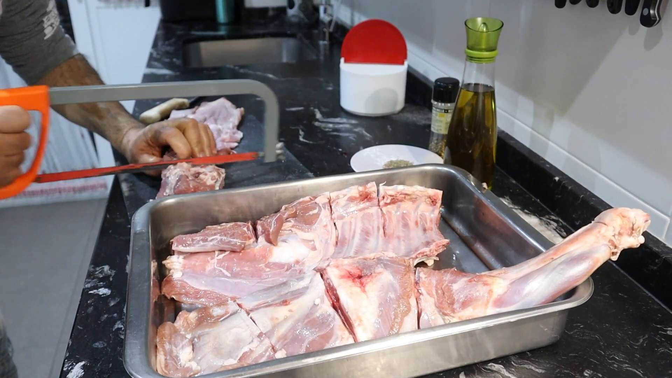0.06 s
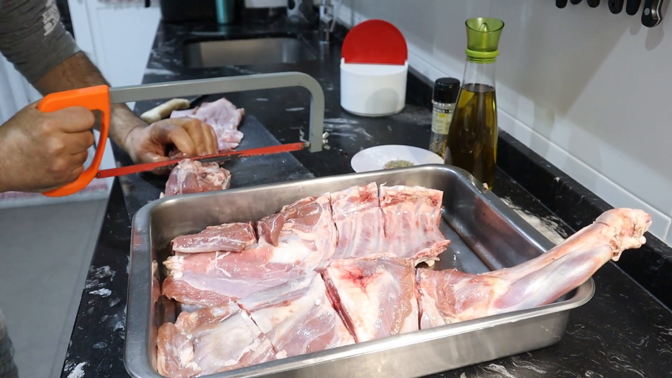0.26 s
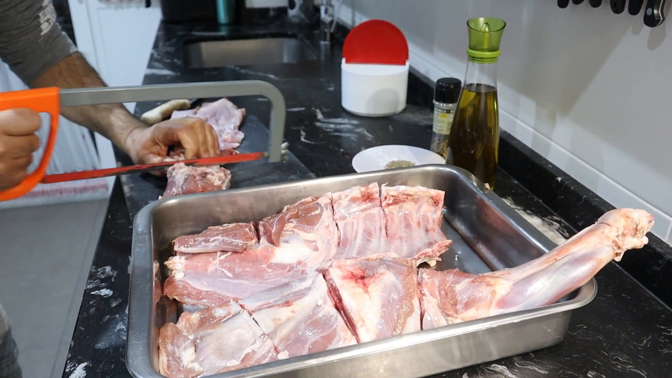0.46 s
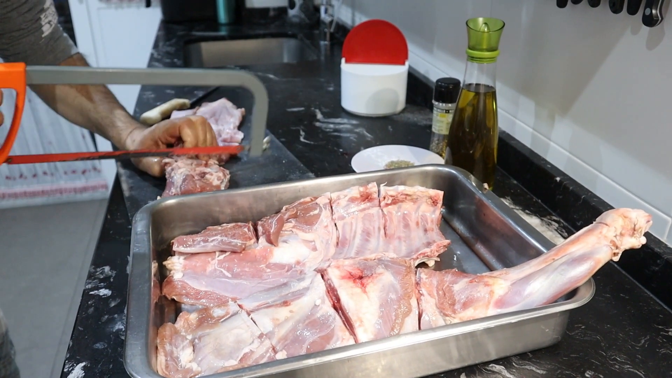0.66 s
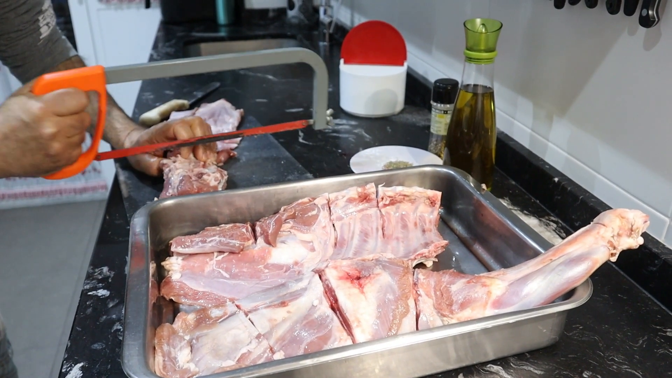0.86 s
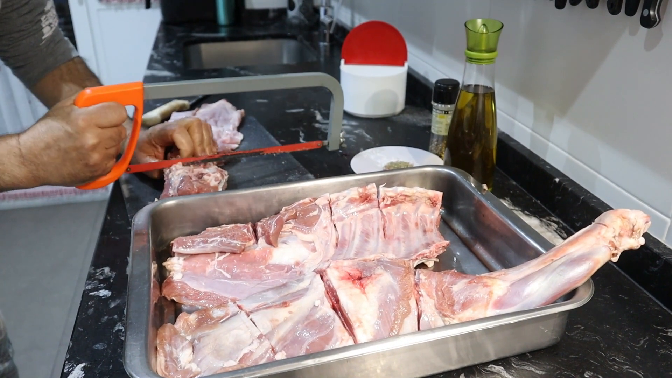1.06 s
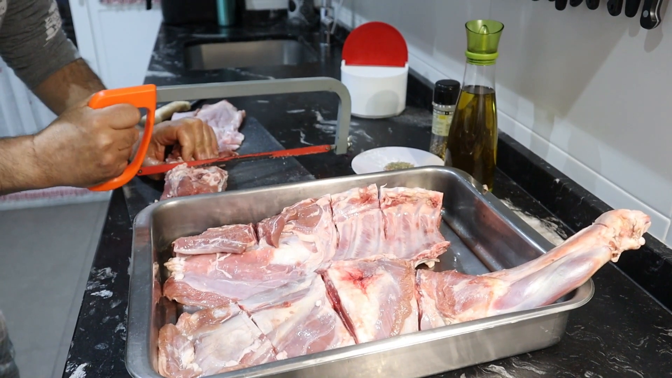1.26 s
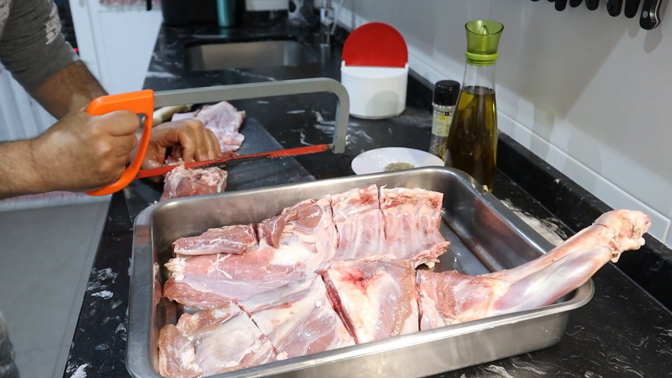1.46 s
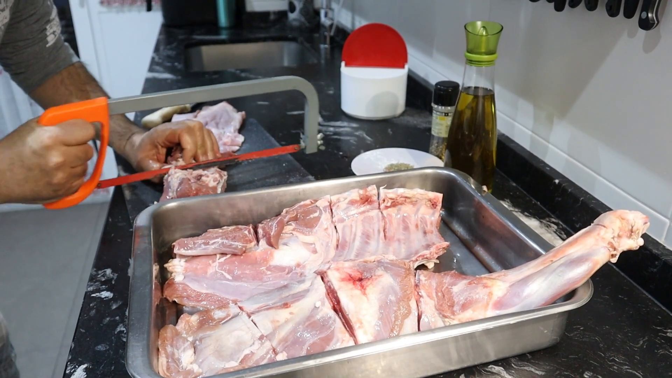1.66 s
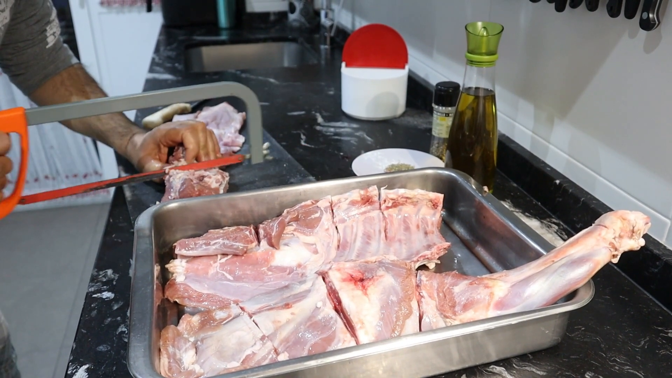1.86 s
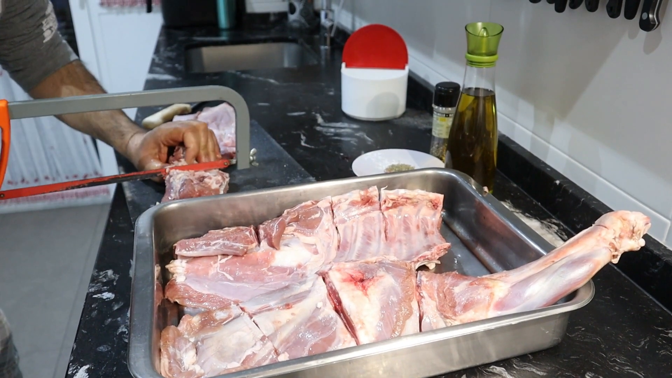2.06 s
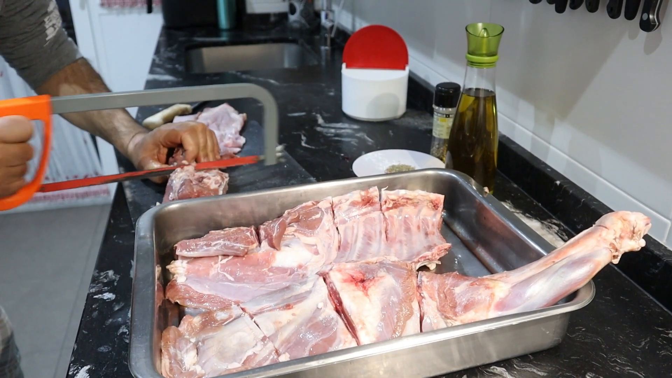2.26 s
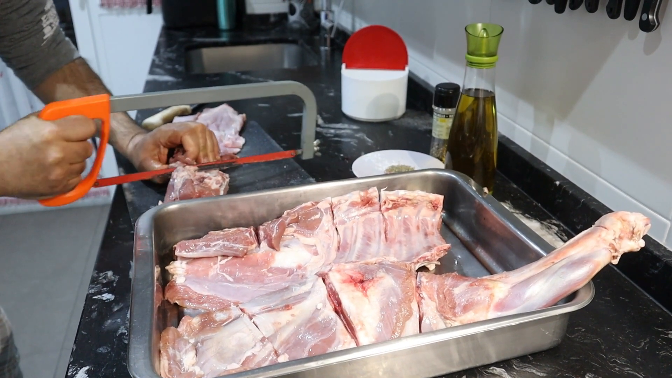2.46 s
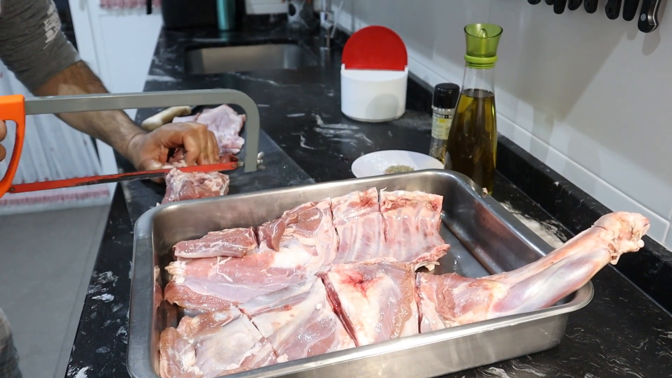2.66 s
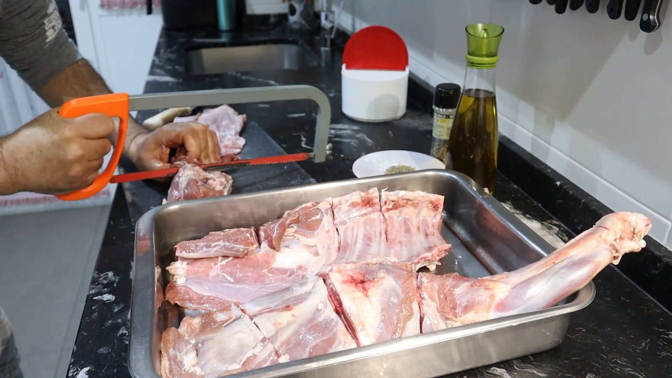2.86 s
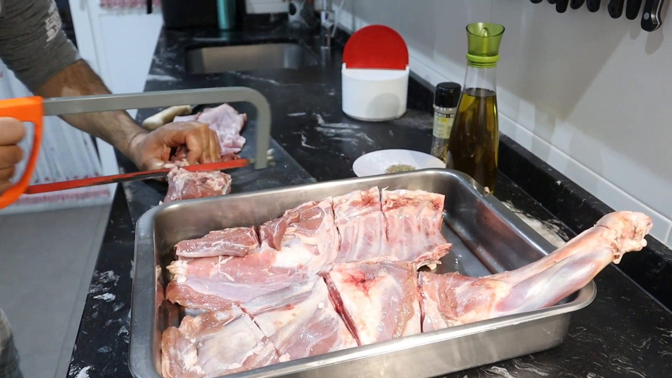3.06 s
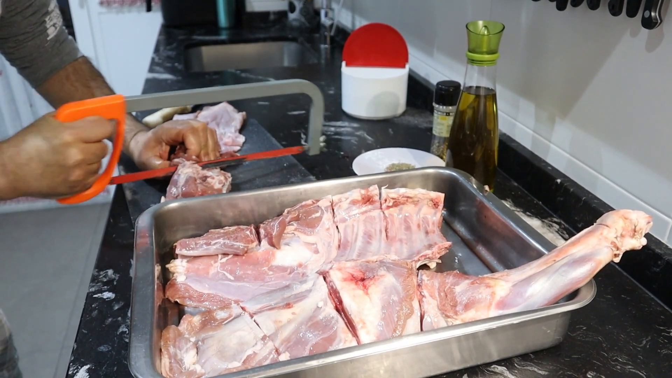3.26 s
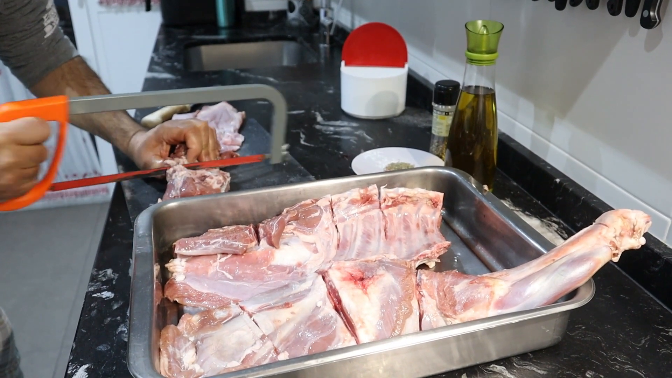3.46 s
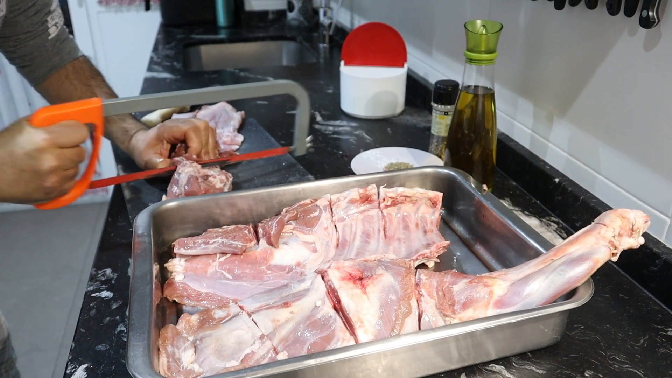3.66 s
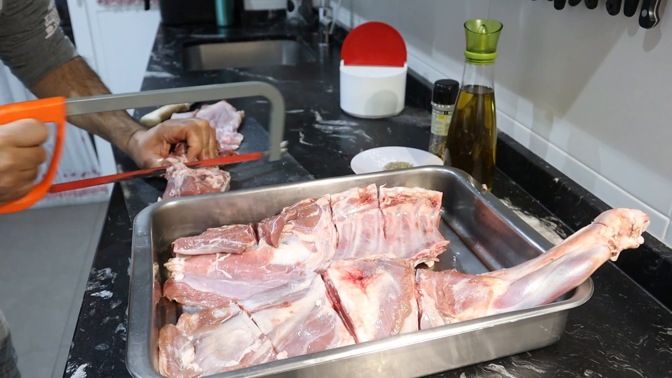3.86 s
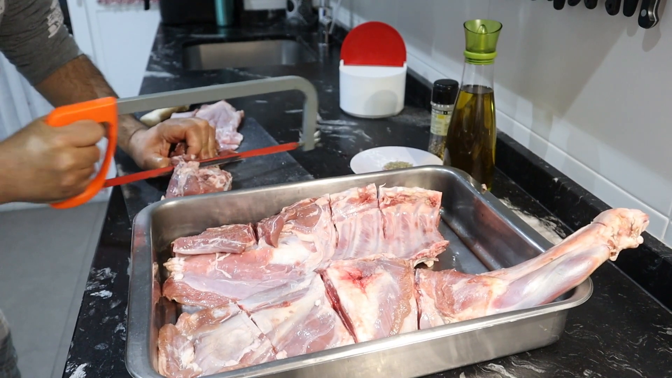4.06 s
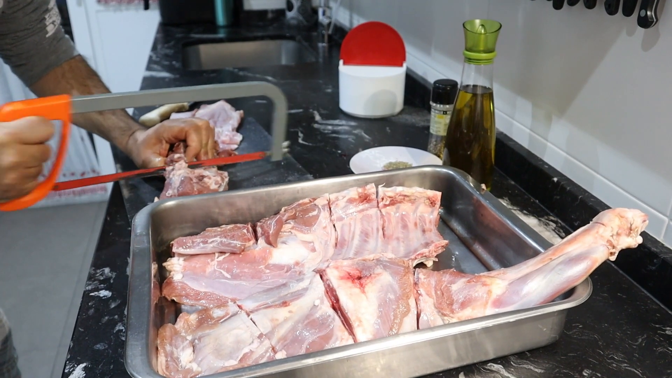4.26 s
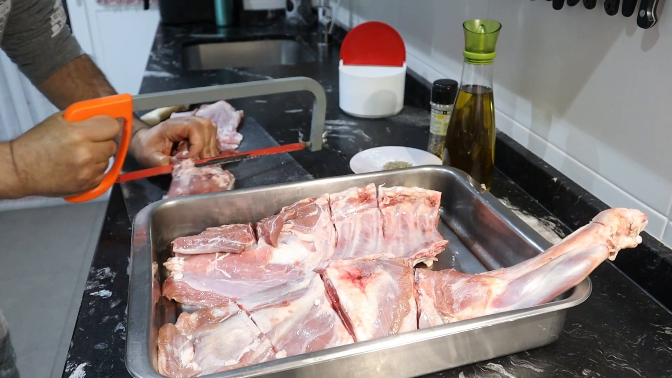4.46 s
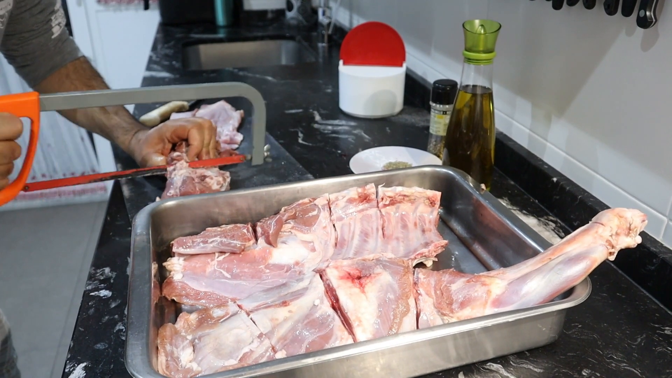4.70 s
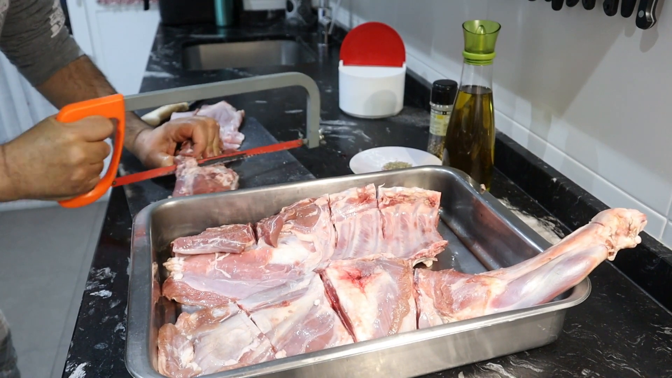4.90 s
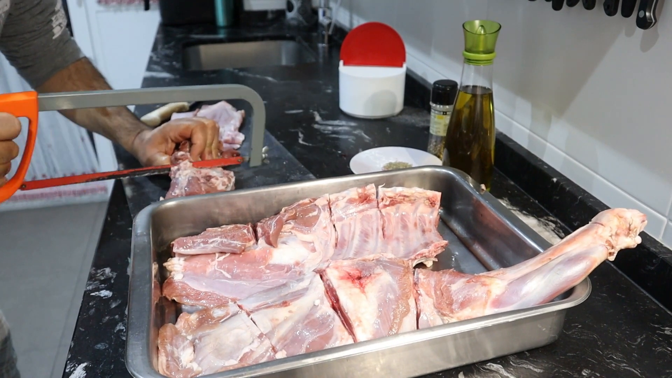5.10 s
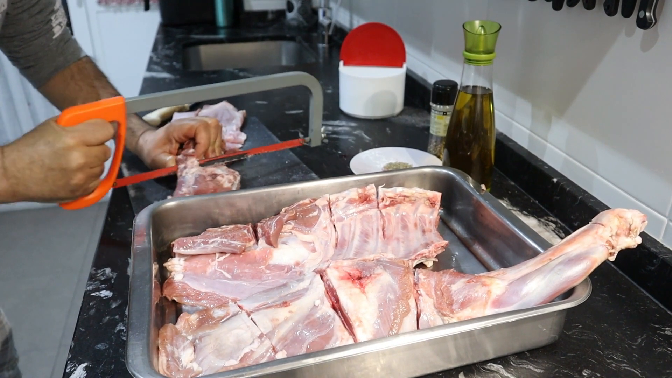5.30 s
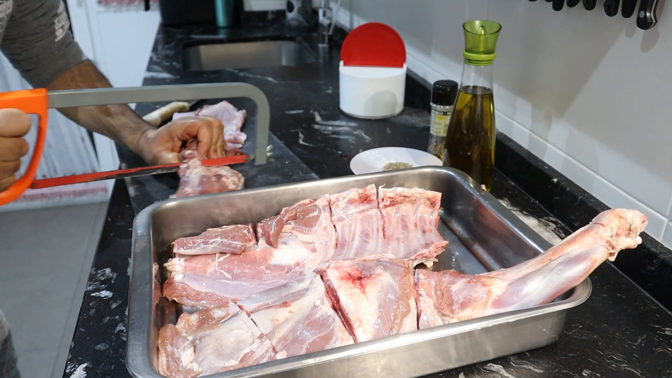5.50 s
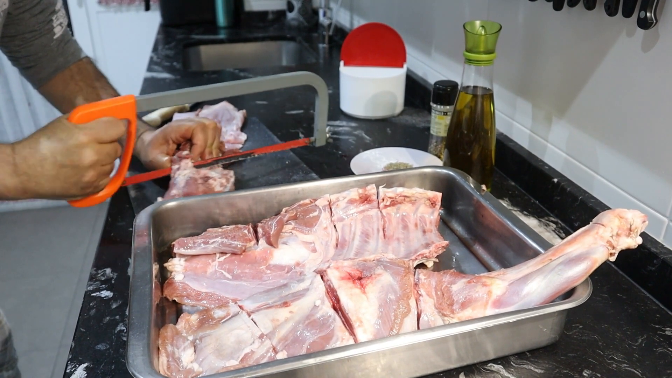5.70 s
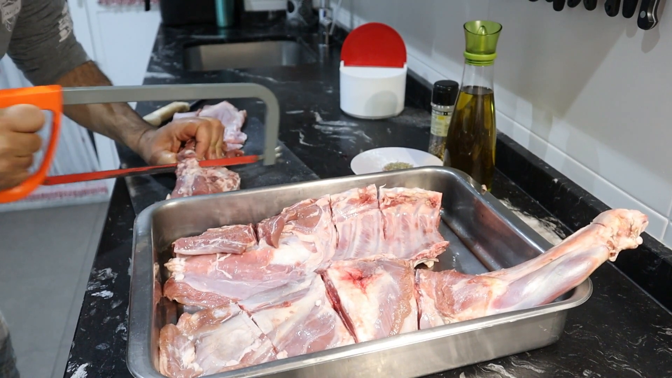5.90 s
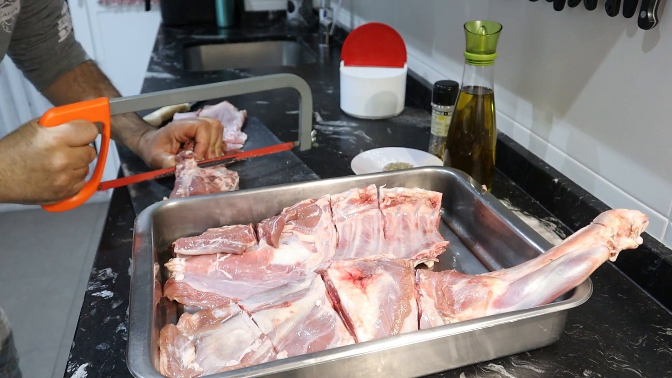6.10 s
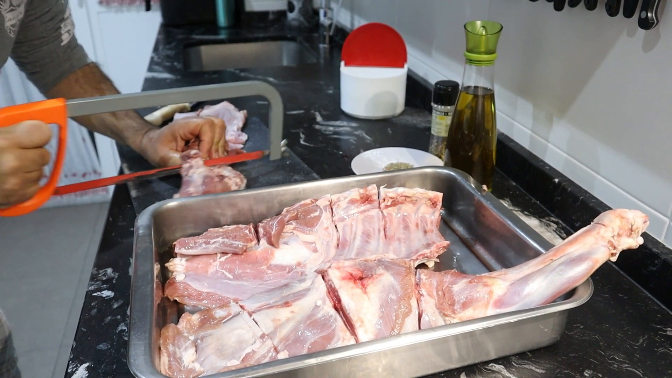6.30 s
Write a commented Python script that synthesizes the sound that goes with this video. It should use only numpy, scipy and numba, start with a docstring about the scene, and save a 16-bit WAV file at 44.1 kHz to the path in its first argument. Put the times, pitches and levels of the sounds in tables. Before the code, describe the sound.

A few light hacksaw strokes on bone, a short pause, then steady gritty sawing with sharp catches and knocks against a kitchen counter.

```python
"""Hacksaw through bone

A hacksaw is drawn to and fro through bone on a stone kitchen counter, an arm's length from a phone.
Teeth chip at the bone in a dense hail of clicks that rasps and rings blade and frame; now and then one
catches and tears free. Hard strokes shake the joint of meat against the counter. A refrigerator hums.
The phone widens the image, turns down when loud, and clips."""
import sys
import numpy as np
from scipy import signal
from scipy.fft import rfft, irfft, next_fast_len
from scipy.io import wavfile
from scipy.ndimage import uniform_filter1d
from numba import njit

SR = 44100
rng = np.random.default_rng(int(sys.argv[2]) if len(sys.argv) > 2 else 0)


def put_to_file(sound):
    """Save the sound as 16-bit audio at rate SR, in the file named by the first command-line argument."""
    columns = np.atleast_2d(sound).T  # one column per channel
    safe = np.clip(columns, -1, 1)
    whole_steps = np.round(safe * 32767)
    wavfile.write(sys.argv[1], SR, whole_steps.astype(np.int16))


N = 279884


def undb(db):
    return 10 ** (np.asarray(db) / 20)


def unit(x):
    return x / np.sqrt(np.mean(x ** 2))


def walk(rate):
    """Slow random modulation: levels held 1 / rate s, joined by ramps."""
    k = int(SR / rate)
    return 0.62 * uniform_filter1d(np.repeat(rng.standard_normal(N // k + 1), k), k)[:N]


@njit
def resonator(x, tuning, damping):
    """Damped oscillator: a state-variable band-pass with gain 1 at its moving centre."""
    y, band, low = np.empty(len(x)), 0., 0.
    for i in range(len(x)):
        g = tuning[i]
        v = (band + g * (x[i] - low)) / (1 + g * (g + damping))
        band, low, y[i] = 2 * v - band, low + 2 * g * v, damping * v
    return y


def ring(x, modes, wander_db=0., glide=0.):
    """Modal superposition in alternating sign; level and pitch may wander as the contact point moves."""
    sound = 0
    for k, (hz, width, db) in enumerate(modes):
        gain = (-1) ** k * undb(db + wander_db * walk(17))
        tuning = np.tan(np.pi * hz * (1 + glide * walk(7)) / SR)
        sound = sound + gain * resonator(x, tuning, width / hz)
    return sound


def colour(x, curve, lag_s=0.):
    """Linear filtering: gain through (Hz, dB) points, with an optional delay."""
    size = next_fast_len(N + 4096)
    hz = np.maximum(np.arange(size // 2 + 1) * SR / size, 1)
    point_hz, point_db = np.transpose(curve)
    gain = undb(np.interp(np.log(hz), np.log(point_hz), point_db))
    return irfft(rfft(x, size) * gain * np.exp(-2j * np.pi * hz * lag_s), size)[..., :N]


# Compressor tones. Each row: frequency in Hz, rms level in dB, left minus right in dB.
HUM_TONES = [(50.2, -44, -0.5), (99.4, -56, 8), (343, -78, 10)]
# Background air. Each row: frequency in Hz, relative spectral density in dB.
AIR_SPECTRUM = [(25, -1), (45, 25), (75, 13), (125, 13), (170, -10), (250, -27), (360, -0.5), (600, -7),
                (1100, -0.5), (2200, -3), (4500, -6.5), (6000, -13.5), (10000, -13.5), (11500, -16),
                (12300, -55)]


def fridge():
    """Periodic vibration of a compressor gives steady tones, over a diffuse rumble and hiss of air."""
    t = np.arange(N) / SR
    phase_per_hz = 2 * np.pi * t + .25 * walk(4) / HUM_TONES[0][0]
    hum = 0
    for hz, db, pan_db in HUM_TONES:
        tone = np.sqrt(2) * undb(db + 5.6 * walk(3.98)) * np.sin(hz * phase_per_hz)
        hum = hum + tone * undb([[pan_db / 2], [-pan_db / 2]])
    air = unit(colour(rng.standard_normal((2, N)), AIR_SPECTRUM))
    return hum + air * undb(-55 + 0.43 * walk(4.7))


# Saw strokes. Each row: start, rise, hold and fall in seconds; rasp level, sheen above rasp, and blade,
# frame, joint and counter levels in dB; time to the fastest moment in seconds, tooth rate then in Hz,
# whine level in dB, blade ring growth from mid-stroke to end of hold in dB, joint lag in seconds.
STROKES = [(-0.05, 0.051, 0.043, 0.12, -43.5, 4, -30, -23.5, -51, -55.5, 0.057, 944, -31.5, 0.5, .01),
           (0.132, 0.042, .18, 0.131, -40.5, 7.5, -48.5, -55, -61.5, -61, 0.053, 888, -65, 0, 0.0067),
           (0.549, 0.066, .055, .14, -42.5, -4, -29.5, -24, -54, -73, 0.069, 982, -35.5, -1, 0.048),
           (1.639, 0.088, 0.0401, .1, -46, -5, -26.5, -23.5, -49, -70, 0.0402, 782, -27, -2, .012),
           (1.651, 0.18, .23, 0.13, -20.5, -8, -21.5, -18.5, -46, -72, 0.17, 1199, -29, -0.3, 0.0033),
           (2.316, 0.06, 0.044, 0.11, -42.5, 5.5, -41, -56.5, -60, -60, 0.086, 1212, -81, -8, 0.0082),
           (2.384, .12, 0.025, 0.12, -28, -0.5, -41.5, -48, -45.5, -52.5, 0.13, 1253, -38.5, 4, 0.013),
           (2.641, 0.064, 0.078, 0.13, -21, -8.5, -23, -23.5, -50.5, -65, 0.092, 1188, -53, 2, 0.021),
           (2.83, 0.054, 0.00989, 0.092, -23, -5, -31, -28.5, -40, -62, 0.049, 1200, -60, 3, 0.013),
           (2.858, .1, .04, 0.1, -23, -5, -28.5, -35, -39, -49, 0.1, 1208, -55, 5.5, 0.0092),
           (3.107, 0.049, 0.08, 0.1, -18, -6.5, -23.5, -24, -43.5, -58, 0.092, 1594, -31, 2, 0.018),
           (3.265, 0.068, .015, 0.078, -17.5, -5, -26, -32, -36.5, -64, 0.087, 1000, -33.5, 3.5, .012),
           (3.343, 0.045, 0.06, 0.097, -18, -5.5, -25.5, -28.5, -37.5, -56, .085, 1243, -26.5, 2.5, 0.022),
           (3.493, 0.036, .01, .06, -23, -6, -29, -45, -47, -64, .05, 1250, -45, -5, 0.011),
           (3.528, .05, .025, 0.11, -14.5, -6.5, -20.5, -21, -54, -66, 0.055, 1785, -13.5, -5, .012),
           (3.562, 0.055, 0.053, 0.13, -23.5, -3, -23.5, -28, -23, -37, 0.083, 1205, -53, 1, 0.0073),
           (3.7, 0.049, 0.01495, 0.076, -19.5, -3, -28, -24, -35, -53, 0.061, 1146, -48, 5.5, 0.009),
           (3.746, 0.047, .055, 0.12, -17, -2, -28.5, -25, -35.5, -49, 0.074, 1194, -29.5, 4.5, 0.0065),
           (3.913, 0.098, 0.046, .12, -19, -4.5, -28.5, -26, -44, -60, 0.12, 1639, -26, 8.5, 0.019),
           (4.113, 0.044, 0.059, .17, -13, -3, -21.5, -26.5, -39.5, -56.5, .08, 921, -21.5, 1.5, .03),
           (4.242, .18, 0.027, 0.15, -21, -4, -36, -26, -44, -51, 0.17, 1570, -28.5, 11, .012),
           (4.509, 0.049, 0.041, 0.123, -14, -2.5, -28, -36, -18.5, -30.5, .07, 1182, -19.5, 3.5, 0.011),
           (4.615, 0.19, 0.055, 0.12, -24, -2.5, -35, -24, -45, -49.5, 0.2, 1736, -34.5, 12, 0.0059),
           (4.892, 0.061, 0.0214, .13, -15.5, 1, -21.5, -40, -35, -50, 0.11, 1089, -27.5, -4, .04),
           (5.029, 0.16, 0.066, 0.072, -24, -3.5, -38, -28, -43, -60, 0.17, 1740, -26.5, 13.5, 0.0051),
           (5.274, 0.053, 0.036, 0.17, -18, 2.5, -20.5, -46, -31.5, -50, 0.085, 1289, -23.5, -2, 0.045),
           (5.421, 0.096, 0.11, 0.089, -27.5, -2, -25.5, -23.5, -39, -58, 0.165, 1750, -21, 4, 0.013),
           (5.647, 0.049, .08, 0.13, -19, 2, -24.5, -48, -34.5, -52.5, 0.105, 1423, -22, -3.5, .03),
           (5.844, 0.062, 0.027, .04, -24.5, -4, -31.5, -21, -30.5, -45, 0.08, 1183, -35, 13, .012),
           (5.905, 0.042, 0.14, .1, -49, -28, -21, -19, -14, -30.5, .08, 1236, -43, -2, .012),
           (6.056, 0.069, .03, 0.095, -17, -0.5, -19.5, -21, -21, -44, 0.085, 1374, -46, -14, 0.003),
           (6.259, 0.11, 0.058, 0.11, -30.5, -7, -37, -30, -31, -39, .1, 1312, -64, -6, 0.011)]


def strokes():
    """Incoherent sources add in power: six envelopes of overlapping strokes, then tooth rate and whine."""
    t = np.arange(0, N + 128, 64) / SR
    (start, rise, hold, fall, rasp, bright, blade, frame, joint, thud,
     fastest, top_hz, whine_db, growth, lag) = np.transpose(STROKES)[..., None]
    age = t - start

    def swell_db(age, fall):
        rising = np.maximum(1 - age / rise, 0) ** 1.7
        falling = (np.maximum(age - rise - hold, 0) / fall) ** 0.95
        return -31.5 * (rising + falling)

    light = swell_db(age, fall)
    treble = swell_db(age - 0.014 * rise, fall)
    heavy = swell_db(age - lag, 1.42 * fall)  # the heavy joint settles more slowly
    speeding = age < fastest
    off_peak = np.abs(age - fastest) / (rise + hold)
    frame = frame - np.where(speeding, 34, 12.5) * off_peak  # sings most at the fastest moment
    blade = blade + growth * np.clip(2 * age / (rise + hold) - 1, -2, 2)
    layers_db = (light + rasp, treble + rasp + bright, light + blade, light + frame,
                 heavy + joint, heavy + thud)
    layers = [np.sqrt(np.sum(undb(db) ** 2, axis=0) + undb(-110) ** 2) for db in layers_db]
    whine_level = undb(whine_db - 28.5 * off_peak + light).sum(axis=0)
    speed = np.maximum(1 - np.where(speeding, 0.8, 0.3) * off_peak, .65)
    weight = undb(np.maximum(light, -200)) ** 2  # the stroke under way sets the tooth rate
    tooth_hz = np.sum(weight * top_hz * speed, axis=0) / weight.sum(axis=0)
    return [np.interp(np.arange(N) / SR, t, curve) for curve in (*layers, tooth_hz, whine_level)]


def chips(per_s, spread_db, chatter_db, chatter_hz):
    """Shot noise: random clicks of uneven size, whose force comes and goes as the blade chatters."""
    hit = rng.random(N) < per_s / SR
    size = undb(spread_db * np.minimum(rng.exponential(size=N), 5)) * rng.choice([-1, 1], N)
    return hit * size * undb(chatter_db * walk(chatter_hz))


# Cutting-edge resonances: the rasp, the sheen above it, and the top treble of a tooth tearing free.
# Each row: frequency in Hz, bandwidth in Hz, gain in dB.
RASP_MODES = [(3660, 1330, -7), (4830, 1160, 0), (5590, 950, 0.5), (7120, 2290, -9.5)]
SHEEN_MODES = [(8170, 1340, 6.5), (8086, 2480, 7.5), (10950, 1920, -0.5), (12540, 3400, -4.5)]
TEAR_MODES = [(13200, 2500, -11.5)]


def cutting_edge(teeth, rasp, sheen, tear):
    """Impacts excite broad treble resonances; a tearing tooth throws a denser spray of chips."""
    spray = rng.standard_normal(N)
    force = np.hypot(rasp, tear)
    drive = (rasp * unit(teeth) + tear * spray) / force
    grit = unit(ring(drive, RASP_MODES, wander_db=1.5, glide=.04))
    shine = unit(ring(drive, SHEEN_MODES, wander_db=1.5, glide=.03))
    lowpass = signal.butter(14, 12000, fs=SR, output="sos")
    return signal.sosfilt(lowpass, force * (grit + sheen / rasp * shine)) + tear * ring(spray, TEAR_MODES)


# Modes of the steel blade and its frame. Each row: frequency in Hz, bandwidth in Hz, gain in dB.
BLADE_MODES = [(833, 63, -22.5), (992.5, 69, -13.5), (1212, 31, -8.5), (1339, 96, -14), (1920, 344, -6.5),
               (2315, 171, 2), (2690, 360, -2.5), (3360, 660, -7.5)]
FRAME_MODES = [(1630, 92, -10.5), (1767, 25.8, 0)]


def blade_and_frame(teeth, blade, frame, clang):
    """Resonance: tooth clicks ring the steel at its natural frequencies, harder at a catch."""
    blade_ring = np.hypot(blade, .6 * clang) * unit(ring(teeth, BLADE_MODES, wander_db=1.5, glide=.02))
    frame_ring = np.hypot(frame, .4 * clang) * unit(ring(teeth, FRAME_MODES))
    return blade_ring + frame_ring


def whine(phase):
    """Periodic forcing: evenly set teeth strike in turn, at a rough pitch that follows blade speed."""
    bites = np.cos(phase) + undb(-17) * np.cos(2 * phase) + undb(-11) * np.cos(3 * phase)
    bites *= undb(2.5 * walk(70))
    return .2 * bites + 8 * ring(bites, BLADE_MODES[1:4]) + 6 * ring(bites, FRAME_MODES)


# Modes of the joint of meat and the counter. Each row: frequency in Hz, bandwidth in Hz, gain in dB.
JOINT_MODES = [(385, 77, -11.5), (504.7, 30.4, -2), (592.4, 64, -3), (810, 125, -3), (1180, 246, -2),
               (1570, 460, -2), (2460, 810, -7)]
COUNTER_MODES = [(53.7, 16.2, 6), (112, 22.3, 6), (218.2, 14, 0), (280, 52, -13.5)]


def joint_on_counter(judder, joint, thud, knock):
    """Forced vibration: the shaken joint and the counter sound their modes, each through a broad band."""
    shaking = ring(ring(judder, JOINT_MODES, wander_db=3.3), [(1000, 1500, 0)])
    rumble = ring(ring(judder, COUNTER_MODES), [(147, 380, 0)])
    return np.hypot(joint, knock) * unit(shaking) + np.hypot(thud, 0.1 * knock) * unit(rumble)


# Teeth catching and tearing free. Each row: time in seconds, peak level of the tear in dB,
# blade ring in dB, low knock in dB, time to decay by 60 dB in seconds.
CATCHES = [(0.159, -16.5, -39, -49, 0.015), (0.169, -12, -56, -43, .017), (0.214, -26, -52, -44, 0.019),
           (0.271, -19, -55, -60, .05), (0.284, -16.5, -39, -67, 0.11), (0.3166, -19, -40, -49, 0.0035),
           (0.365, -11.5, -56, -67, 0.0052), (0.574, -31, -53, -43, 0.015), (0.600, -20, -26, -62, .008),
           (1.468, -48, -71, -82, 0.085), (1.676, -16, -30, -62, .017), (2.329, -46, -60.5, -70, 0.016),
           (2.371, -8.5, -39, -68, 0.027), (2.429, -17.5, -52, -71, 0.013), (2.471, -9, -51, -59, 0.018),
           (2.679, -11, -23, -46, 0.027), (2.875, 3, -39, -42, 0.033), (2.936, -4, -34, -50, 0.035),
           (3.14, 5.5, -19, -33, .02), (3.313, 1.5, -24, -51, 0.017), (3.3794, 3, -17, -49, 0.028),
           (3.517, -10.5, -30, -45, 0.014), (3.536, -1.5, -28, -44, 0.01), (3.5682, 4, -23, -47, 0.015),
           (3.6109, -1, -2, -12.5, 0.022), (3.736, -13, -31, -18, 0.019), (3.7944, 6, -19, -36, 0.024),
           (3.9874, -4, -26, -36, 0.014), (4.0298, 4.5, -27, -46, 0.019), (4.14, -2, -36, -31, 0.026),
           (4.532, -3, -19, -23.5, 0.013), (4.554, -2, -6.5, -17.5, 0.08), (4.849, 1.5, -43, -76, 0.023),
           (4.926, -4, -69, -36, 0.024), (4.9436, 8, -10, -35, 0.013), (4.9758, -3.5, -34, -60, 0.015),
           (5.136, -14, -45, -40, 0.018), (5.236, -7, -26, -40, 0.012), (5.298, -1, -35, -27, 0.0098),
           (5.3243, 7, -13, -21.5, 0.015), (5.3832, 1, -16, -39, 0.028), (5.508, -23, -15, -32, 0.018),
           (5.683, 3, -17.5, -29, 0.023), (5.7048, -10, -7.5, -25, 0.019), (5.898, 2, -33, -35, 0.018),
           (5.930, -8, 3.5, 0, 0.0061), (5.9626, -13, -3.5, -12, 0.014), (5.997, -25, -10, -15, 0.011),
           (6.082, -24, -15.5, -6, 0.011), (6.102, -11, -18, -5.5, 0.015), (6.109, 0, -24, -5, .012)]


def catches():
    """Stick and slip: envelopes of each catch's tear, clang and knock rise fast and decay exponentially."""
    rise_s, crest_db = 0.0031, 15.5  # crest: peak of a burst of chips over its rms
    force = np.zeros((3, N))
    t = np.arange(SR // 8) / SR
    for start, tear_db, ring_db, knock_db, t60 in CATCHES:
        i = int(start * SR)
        shape = np.minimum(t / rise_s, 1) ** 2 * undb(-60 * np.maximum(t - rise_s, 0) / t60)
        force[:, i:i + len(t)] += undb([[tear_db - crest_db], [ring_db], [knock_db]]) * shape
    return force


# Modes of the bone. Each row: frequency in Hz, bandwidth in Hz, gain in dB.
BONE_MODES = [(1240, 270, -1), (1785, 350, -3), (3450, 1600, 0), (5080, 690, 5)]


def splinters():
    """Brittle fracture: each catch opens with three quick blows that ring the bone and tick off the edge."""
    blows, ticks = np.zeros((2, N))
    lags_s = rng.random((len(CATCHES), 3)) * [0, .002, .004]
    for (start, tear_db, ring_db, *_), lags in zip(CATCHES, lags_s):
        at = ((start + 0.0019 + lags) * SR).astype(int)
        blows[at] += undb(ring_db + 18.5) * np.array([1, -.8, .6])
        ticks[at] += undb(tear_db - 5) * np.array([1, -.6, .4])
    return ring(blows, BONE_MODES) + ring(ticks, RASP_MODES + SHEEN_MODES)


def saw():
    """Source and filter: tooth clicks drive edge and steel; a sparser judder drives joint and counter."""
    rasp, sheen, blade, frame, joint, thud, tooth_hz, whine_level = strokes()
    tear, clang, knock = catches()
    # the hand is unsteady and every tooth bites a little early or late
    phase = 2 * np.pi * np.cumsum(tooth_hz * (1 + .03 * walk(60) + .09 * walk(400))) / SR
    steel = whine_level * whine(phase)
    teeth = chips(5000, spread_db=2.5, chatter_db=2.5, chatter_hz=70)
    teeth *= 1 + 0.38 * np.cos(phase)  # chips fly in step with the passing teeth
    judder = chips(2500, spread_db=1.5, chatter_db=3, chatter_hz=90)
    steel += cutting_edge(teeth, rasp, sheen, tear)
    steel += blade_and_frame(teeth, blade, frame, clang)
    # thin steel radiates little bass
    steel = signal.sosfilt(signal.butter(6, 820, "high", fs=SR, output="sos"), steel)
    return steel + joint_on_counter(judder, joint, thud, knock) + splinters()


def kitchen(x, paths=8):
    """Reverberation: quick scatter off counter and tray, then a tail off tiled walls, treble dying first."""
    near_t60_s, wall_t60_s, treble_t60_s = .025, 0.27, 0.093
    t = np.arange(SR // 3) / SR
    # the saw moves, so its sound shifts between paths, each different at the two microphone ports
    share = np.array([0.18 + walk(40) for _ in range(paths)])
    share /= np.sqrt(np.sum(share ** 2, axis=0))
    late, early = rng.standard_normal((2, paths, 2, len(t))) * np.minimum(t / 0.0019, 1)
    low = signal.lfilter(*signal.butter(1, 3000, fs=SR), late)
    walls = low * undb(-60 * t / wall_t60_s) + (late - low) * undb(-60 * t / treble_t60_s)
    near = early * undb(-60 * t / near_t60_s)
    response = (undb(-5) * unit(walls) + unit(near)) / np.sqrt(len(t))
    return signal.oaconvolve((share * x)[:, None], response, axes=2)[..., :N].sum(axis=0)


def scene():
    """Superposition of direct sound, room and hum; the saw is to the left, so the right port lags."""
    left = saw()
    right = colour(left, [(20, 0.0052), (20000, 0)], lag_s=9e-5)
    return np.array([left, right]) + kitchen(left) + fridge()


@njit
def follow(x, attack_s, release_s):
    """Peak detection: an envelope quick to rise and slow to fall."""
    y, level = np.empty(len(x)), 0.
    for i in range(len(x)):
        level += (x[i] - level) / (SR * (attack_s if x[i] > level else release_s))
        y[i] = level
    return y


# The phone's response to left minus right. Each row: frequency in Hz, gain in dB.
SIDE_GAIN = [(60, -7), (300, -5), (1200, -1), (2500, 3), (5000, 1.5), (9000, 6), (15000, 21)]


def record(dry):
    """Mid-side widening and compression: the phone also clips and cuts the top treble."""
    mid = (dry[0] + dry[1]) / 2
    side = colour((dry[0] - dry[1]) / 2, SIDE_GAIN)
    wide = np.array([mid + side, mid - side])
    level = follow(np.abs(wide).max(axis=0), attack_s=0.0097, release_s=1.5)
    wide *= np.minimum(1, (0.5 / (level + 1e-9)) ** 0.79)
    lowpass = signal.ellip(10, .2, 70, 15650, fs=SR, output="sos")
    return signal.sosfilt(lowpass, np.clip(wide, -1, 1))


dry = scene()
out = record(dry)
put_to_file(out)
```